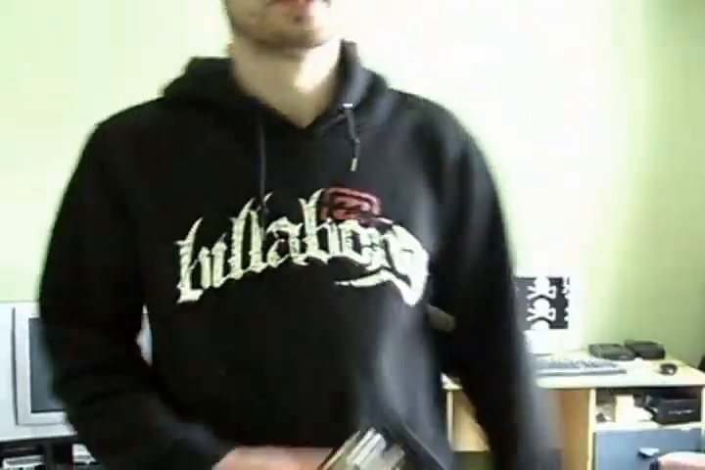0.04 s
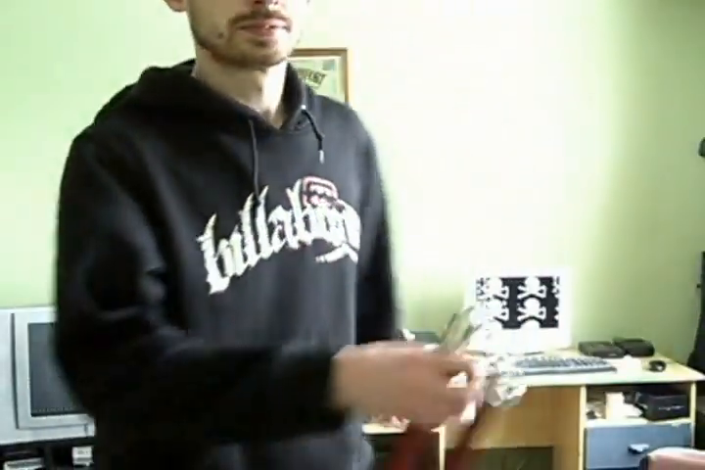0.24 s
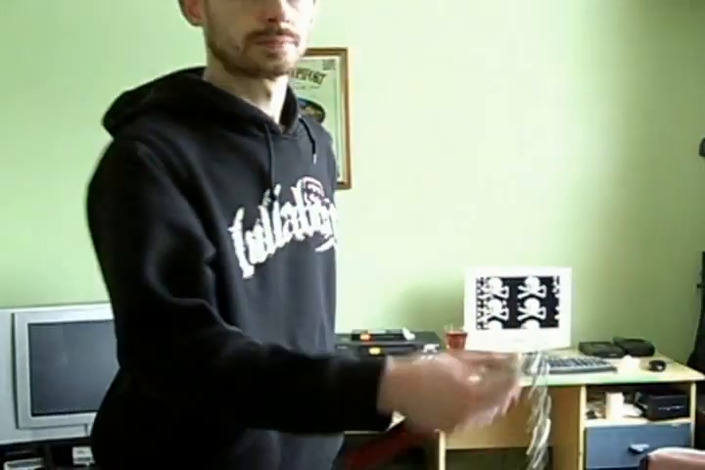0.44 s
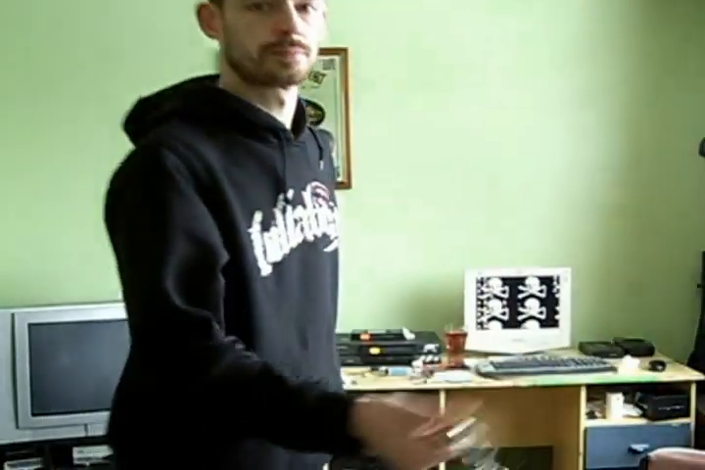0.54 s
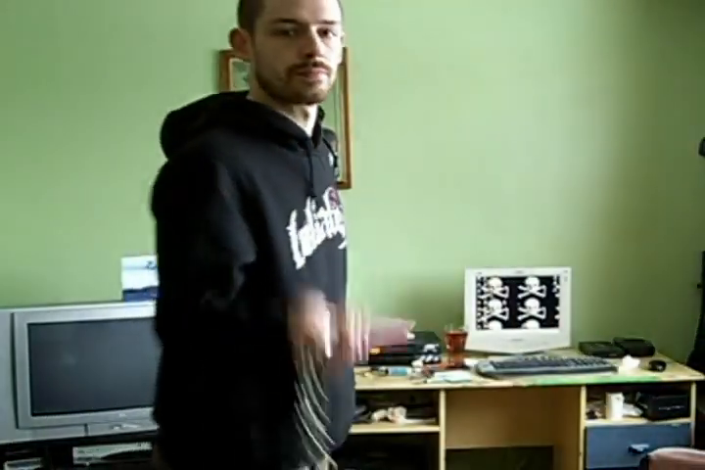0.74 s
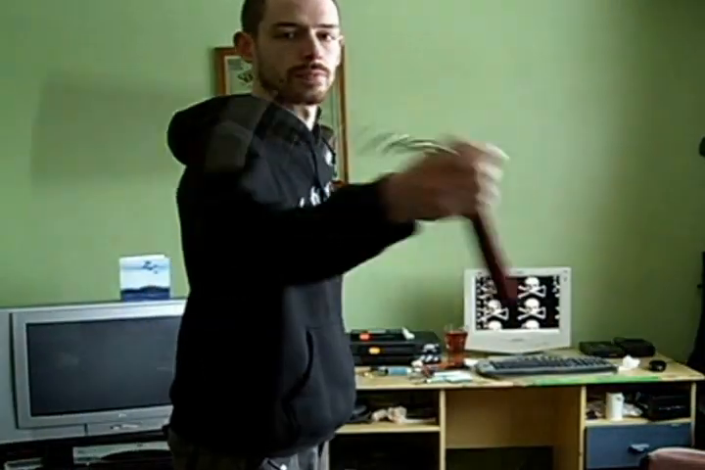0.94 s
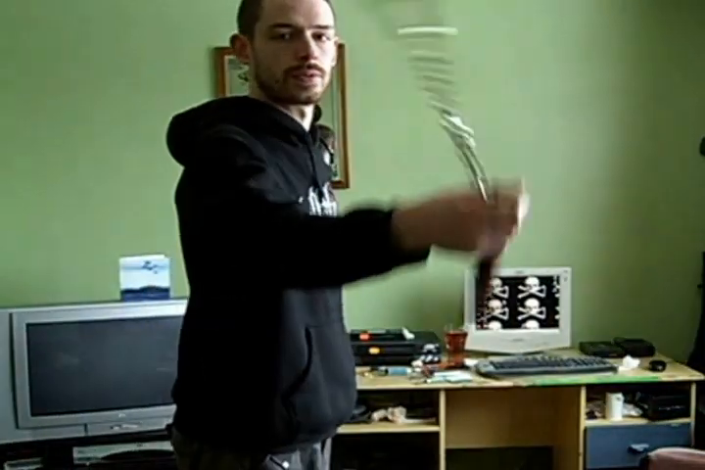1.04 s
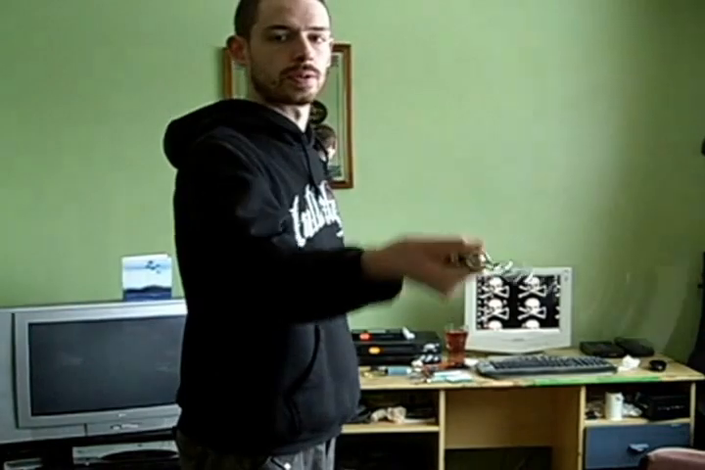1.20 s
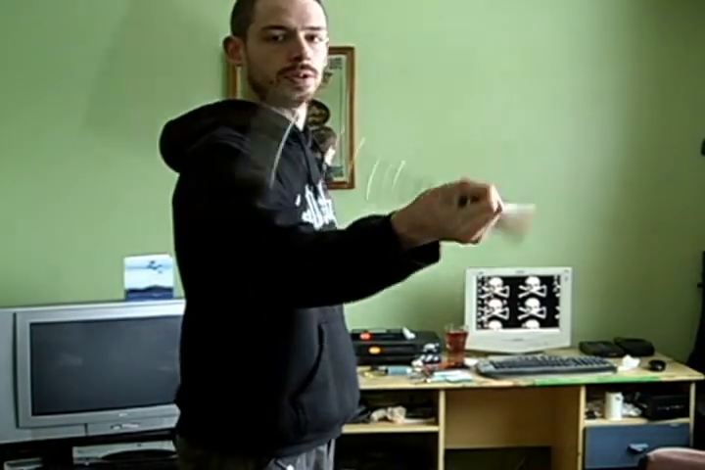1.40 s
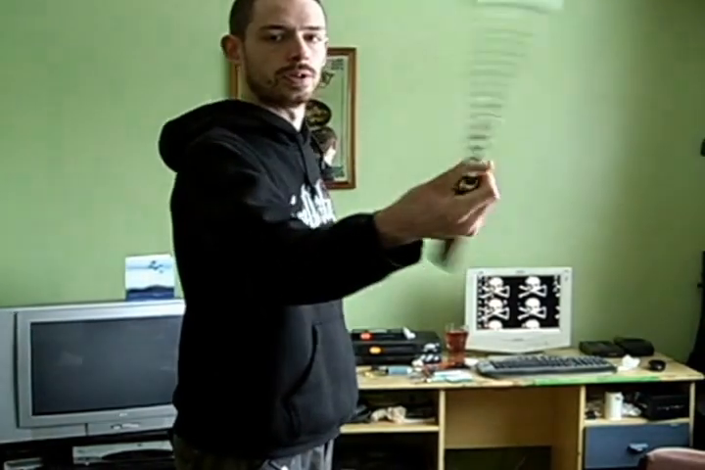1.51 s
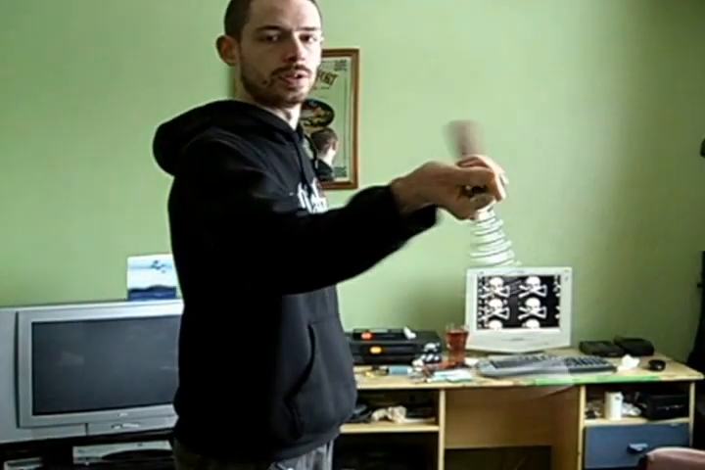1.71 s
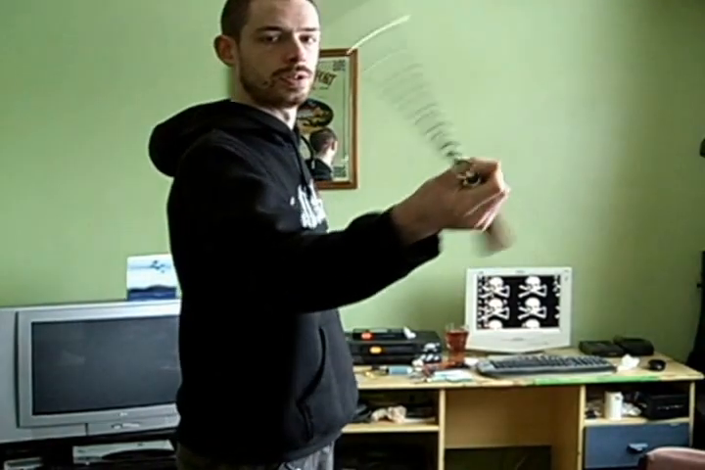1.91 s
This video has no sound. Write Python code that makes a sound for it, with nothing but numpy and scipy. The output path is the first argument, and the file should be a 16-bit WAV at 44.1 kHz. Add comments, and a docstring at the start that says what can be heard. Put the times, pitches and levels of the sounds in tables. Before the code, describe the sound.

Chain links on a nunchaku ring in a short, high rattle after a brief clatter fades. Irregular metal clicks and light wooden knocks follow, with soft cloth rustling and one faint swish, nearby in a quiet room.

```python
"""Nunchaku in a small room

A clatter dies away, the steel chain links strike and ring as the sticks are gathered, then links and
swivel click and the handles knock while a sleeve rustles and a stick whooshes. The walls answer
the chain and handles; a thin steady whine lies in the quiet room tone."""
import sys
import numpy as np
from scipy import signal
from scipy.fft import rfft, irfft
from scipy.io import wavfile
from scipy.ndimage import uniform_filter1d

SR = 44100
rng = np.random.default_rng(int(sys.argv[2]) if len(sys.argv) > 2 else 0)


def digitize_waveform(pressure):
    """Quantize a signal to 16-bit integers and store it at the path in sys.argv[1].

    Rows of a 2-D input are taken as channels; values are limited to [-1, 1].
    """
    field = np.atleast_2d(pressure).T
    bounded = np.clip(field, -1, 1)
    quanta = np.round(bounded * 32767).astype(np.int16)
    wavfile.write(sys.argv[1], SR, quanta)


N = 85995


def undb(db):
    """Decibels to gain."""
    return 10 ** (np.asarray(db) / 20)


def unit(x):
    """Scale to rms 1."""
    return x / np.sqrt(np.mean(x ** 2) + 1e-30)


def clock():
    """Sample times [s]."""
    return np.arange(N) / SR


def curve(points):
    """Gain along (time [s], level [dB]) points."""
    times_s, levels_db = np.array(points).T
    return undb(np.interp(clock(), times_s, levels_db))


def colour(x, points):
    """Filter by (frequency [Hz], level [dB]) points, to rms 1."""
    hz, db = np.array(points).T
    bins_hz = np.maximum(np.fft.rfftfreq(N, 1 / SR), 1)
    gain = undb(np.interp(np.log(bins_hz), np.log(hz), db))
    return unit(irfft(rfft(x) * gain, N))


def band(x, lo_hz, hi_hz):
    """Band-pass; the low edge stays at least 10 Hz under the high edge."""
    hi_hz = min(hi_hz, SR / 2 - 100)
    lo_hz = min(lo_hz, hi_hz - 10)
    return signal.sosfilt(signal.butter(2, [lo_hz, hi_hz], "band", fs=SR, output="sos"), x)


def steep_band(x, lo_hz, hi_hz):
    """Band-pass twice."""
    return band(band(x, lo_hz, hi_hz), lo_hz, hi_hz)


def add(out, start_s, x):
    """Mix x in at start_s."""
    i = max(int(start_s * SR), 0)
    out[i:i + len(x)] += x[:N - i]


def steady(x, window_s=0.009):
    """Level slow swells to rms 1, keep fast beating."""
    return x / np.sqrt(uniform_filter1d(x ** 2, size=int(window_s * SR)) + 1e-20)


def resonance(hz, width_hz):
    """Noise-driven mode at steady level."""
    pole = np.exp((2j * np.pi * hz - np.pi * width_hz) / SR)
    return steady(signal.lfilter([1], [1, -pole], rng.standard_normal(N)).imag)


def swell(peak_s, sigma_s, lo_hz, hi_hz):
    """Band noise under a Gaussian envelope."""
    envelope = np.exp(-0.5 * ((clock() - peak_s) / sigma_s) ** 2)
    return unit(band(rng.standard_normal(N), lo_hz, hi_hz)) * envelope


def taps(rows, note_db, crack_db, rise_s=0.0005):
    """Struck part: a damped note with a noisy crack around it."""
    out, t = np.zeros(N), clock()[:SR // 12]
    for start_s, hz, db, decay_s in rows:
        crack = unit(steep_band(rng.standard_normal(len(t)), hz * 0.59, hz * 1.39))
        note = np.sqrt(2) * np.sin(2 * np.pi * hz * t)
        envelope = np.exp(-t / decay_s) * (1 - np.exp(-t / rise_s))
        add(out, start_s, undb(db) * envelope * (undb(note_db) * note + undb(crack_db) * crack))
    return out


def room_tone(noise_db=-56, whine_db=-68):
    """Steady background noise with a thin, high whine."""
    # background spectrum (frequency [Hz], relative level [dB])
    spectrum = [(15, -43), (25, -0.5), (64, -13.5), (229, 1), (394, 1), (754, -2), (1020, -8.5), (1290, -6),
                (1600, -20), (6380, -18), (7510, -30), (11900, -19.5), (16000, -42.5)]
    noise = colour(rng.standard_normal(N), spectrum)
    return undb(noise_db) * noise + undb(whine_db) * resonance(hz=14400, width_hz=41)


def room(x, build_s=0.0083):
    """Near wall reflections, then four diffuse bands plus a faint narrow ring near 7.7 kHz."""
    # decaying tails (low edge [Hz], high edge [Hz], T60 [s], level [dB])
    # last row: the narrow ring; its inverted edges give a 10 Hz wide line
    tails = [(102, 1500, 0.47, -20), (1180, 3150, 0.23, -2), (3500, 7900, 0.29, -7),
             (8000, 12900, 0.247, -9.5), (12000, 7700, 0.2, -19.5)]
    # wall reflections (delay [s], level [dB])
    echoes = [(.0042, -12.5), (0.0172, -19.5), (0.0214, -10)]
    response, t = np.zeros(N), clock()[:SR // 2]
    for lo_hz, hi_hz, t60_s, db in tails:
        envelope = undb(-60 * t / t60_s) * (1 - np.exp(-t / build_s))
        envelope /= np.sqrt(np.sum(envelope ** 2))
        add(response, 0, undb(db) * band(rng.standard_normal(len(t)), lo_hz, hi_hz) * envelope)
    for delay_s, db in echoes:
        add(response, delay_s, undb([db]))
    return signal.fftconvolve(x, response[:len(t)])[:N]


def low_thump(level_db=-53):
    """A faint, brief low rumble."""
    return undb(level_db) * swell(peak_s=0.31, sigma_s=0.03, lo_hz=26, hi_hz=156)


def sleeve(grain_db=1.9):
    """Cloth rustles with the arm."""
    # rustle envelope (time [s], level [dB])
    levels = [(0, -58), (.19, -48.5), (.29, -43.5), (.36, -51), (.4, -49.5), (.46, -47.5), (.55, -57),
              (.61, -51), (.69, -58), (.85, -55.5), (1.0, -52), (1.09, -51), (1.28, -46), (1.38, -45),
              (1.46, -51), (1.65, -55), (1.95, -58.5)]
    # rustle spectrum (frequency [Hz], relative level [dB])
    spectrum = [(80, -34.5), (200, -1), (700, -2), (1500, 0), (2600, -4.5), (5000, -15.5), (8000, -18),
                (16000, -18)]
    grain = unit(uniform_filter1d(rng.standard_normal(N), size=200))
    return colour(rng.standard_normal(N) * undb(grain_db * grain), spectrum) * curve(levels)


def whoosh():
    """Air rushes past the stick at its fastest."""
    # air swells (peak time [s], sigma [s], frequency [Hz], level [dB])
    swells = [(1.522, 0.071, 720, -50.5), (1.47, 0.024, 1450, -51.5)]
    return sum(undb(db) * swell(peak_s, sigma_s, hz * 0.784, hz * 1.11)
               for peak_s, sigma_s, hz, db in swells)


def clatter(wash_db=-35, hold_s=0.03, wash_fall_db_per_s=174, ring_fall_db_per_s=145.5):
    """A diffuse clatter fades; its resonances ring a little longer."""
    # wash spectrum (frequency [Hz], relative level [dB])
    spectrum = [(100, -29.5), (213, -11.5), (452, -1), (750, -9), (1070, -13.5), (1600, -13), (2050, -14.5),
                (3180, -12.5), (4730, -8), (7200, -20), (11900, -8.5), (15000, -31)]
    # resonances (frequency [Hz], width [Hz], level [dB])
    modes = [(446, 67, -45), (1077, 16, -37.5), (1153, 60, -46.5), (1946, 49, -51.5), (2142, 32, -47),
             (3780, 51, -50.5), (4770, 150, -44)]
    fall_s = np.maximum(clock() - hold_s, 0)
    ring = band(sum(undb(db) * resonance(hz, width_hz) for hz, width_hz, db in modes), 300, 10000)
    wash = undb(wash_db) * colour(rng.standard_normal(N), spectrum)
    return ring * undb(-ring_fall_db_per_s * fall_s) + wash * undb(-wash_fall_db_per_s * fall_s)


def knocks():
    """Wooden handles knock and scrape: mostly crack."""
    # handle contacts (time [s], frequency [Hz], relative level [dB], decay [s])
    hits = [(.064, 1880, -36, 0.006), (.16, 203, -48, 0.023), (0.1942, 1680, -37.5, 0.0029),
            (0.3904, 1130, -37.5, 0.011), (0.399, 1840, -32.5, 0.004), (.594, 1370, -51, 0.0011),
            (.742, 1890, -33.5, 0.0016), (.746, 1500, -36, 0.0017), (.808, 336, -44, 0.0069),
            (.935, 1920, -35, .0012), (.9355, 1000, -54, 0.0013), (1.0197, 1530, -28, 0.0017),
            (1.3055, 1840, -37, 0.0021), (1.372, 1296, -43.5, 0.017), (1.372, 4900, -42.5, 0.016)]
    return taps(hits, note_db=-4, crack_db=2)


def pings():
    """Short tonal pings: high metal ticks and one lower, squeaky handle ring."""
    # pings (time [s], frequency [Hz], relative level [dB], decay [s])
    hits = [(.1612, 5300, -38.5, 0.0013), (.3335, 15500, -25, 0.0036), (.3462, 1890, -27.5, 0.0035),
            (.3795, 14430, -21, 0.002), (.532, 6360, -43, .0012), (.594, 3140, -41, 0.0015),
            (.6125, 4940, -36.5, 0.0017), (.6125, 6100, -37, 0.0013), (.6296, 4460, -47, 0.0031),
            (.7302, 6630, -34, 0.0016), (1.0995, 3020, -35, 0.00083), (1.113, 4570, -43, 0.0022),
            (1.1309, 4100, -31, 0.00074), (1.167, 4750, -31, 0.0015), (1.1668, 15200, -15, 0.00082),
            (1.2428, 11840, -21.5, 0.00051), (1.2428, 5150, -35.5, 0.0013), (1.3058, 4970, -36, 0.0014),
            (1.3601, 3290, -31.5, 0.0015), (1.3601, 5290, -22, 0.00062), (1.363, 2410, -35.5, 0.0027),
            (1.5255, 12900, -51, 0.0026), (1.725, 4850, -40.5, 0.0012), (1.002, 5130, -40, .0008)]
    return taps(hits, note_db=4, crack_db=-12)


def ticking(rate_per_s=24, drive_db=-20.5):
    """Loaded links creep against each other in faint, high ticks."""
    hits = (rng.random(N) < rate_per_s / SR) * rng.uniform(0.45, 1, N)
    return steep_band(undb(drive_db) * hits, lo_hz=11870, hi_hz=13500)


def chatter(rate_per_s=3600):
    """Dense, tiny contacts as links slide over each other."""
    # chatter envelope (time [s], level [dB])
    levels = [(0, -60), (.13, -56), (.19, -54), (.21, -41.5), (.25, -57), (.285, -53), (.315, -50),
              (.335, -34.5), (.36, -44), (.39, -35), (.43, -42.5), (.5, -65.5), (.95, -54.5), (1.13, -54),
              (1.19, -50.5), (1.28, -53.5), (1.45, -60.5), (1.95, -81)]
    # chatter spectrum (frequency [Hz], relative level [dB])
    spectrum = [(150, -34), (1000, -2), (3500, -5), (5000, 0), (7300, -7.5), (10000, -2.5), (12000, 0),
                (16000, -6.5)]
    hits = (rng.random(N) < rate_per_s / SR) * rng.choice([-1, 1], N)
    return colour(hits, spectrum) * curve(levels)


def snap(t, decay_s):
    """Tiny decaying burst with an even spectrum."""
    spectrum = rfft(rng.standard_normal(len(t)) * np.exp(-t / decay_s))
    whitened = irfft(spectrum / np.abs(spectrum), len(t))
    return whitened * np.exp(-t / (decay_s * 2 * np.pi))


def clicks(energy_window_s=0.004):
    """Taut chain and swivel snap together: short bursts, each with its own colour."""
    # clicks, before band gain (time [s], body [dB], low treble [dB], treble [dB], top [dB])
    hits = [(0.1945, -45.5, -58, -48, -44), (0.323, -57, -41, -35, -34), (0.332, -51, -50, -40, -31),
            (.384, -36.5, -58, -32.5, -43), (0.3888, -42, -37.5, -39, -30), (0.594, -44, -55, -71, -67),
            (0.6125, -45, -44, -44.5, -48), (0.7309, -47, -48, -49.5, -48), (1.0994, -39, -45.5, -69, -68),
            (1.1309, -64, -41, -45.5, -47), (1.167, -43, -37, -34.5, -25), (1.243, -60, -62, -49, -44),
            (1.263, -43, -45.5, -43, -51), (1.3055, -55, -45, -48, -51), (1.3599, -50, -35.5, -54, -64),
            (1.3637, -41, -42.5, -52, -68), (1.5254, -64, -50, -55, -48), (1.551, -51.5, -54, -70, -54),
            (1.6427, -60, -55, -57.5, -45.5), (1.6566, -48, -53.5, -55, -55),
            (1.7253, -54, -55.5, -70, -48.5), (1.785, -50, -59, -54.5, -68.5)]
    # those four bands (low edge [Hz], high edge [Hz], decay [s], gain [dB])
    bands = [(363, 2760, 0.0014, -1.5), (2630, 7140, 0.0014, 1), (7200, 13100, 0.0017, 2.5),
             (11050, 15000, 0.00063, 0)]
    out, t = np.zeros(N), clock()[:SR // 40]
    for start_s, *levels_db in hits:
        for db, (lo_hz, hi_hz, decay_s, gain_db) in zip(levels_db, bands):
            burst = steep_band(snap(t, decay_s), lo_hz, hi_hz)
            burst *= np.sqrt(energy_window_s * SR / np.sum(burst ** 2))
            add(out, start_s, burst * undb(db + gain_db))
    return out


def jingle(build_s=0.0017, decay_s=0.016, contact_db=-18.5, contact_decay_s=0.0077):
    """Each strike ticks and renews the ring: beating modes if links are free, one broad if damped."""
    # link-on-link strikes (time [s], level [dB], damped share [0-1])
    strikes = [(0.195, -31, 0), (0.206, -18.5, 0), (0.211, -20.5, 0), (0.2285, -16, 0.14),
               (0.255, -16.5, 0), (0.271, -17.5, 0), (0.2782, -11.5, 0), (0.291, -12.5, 0.1),
               (0.32, -17.5, 0.2), (0.332, -21, 0.6), (0.729, -39.5, 0.5), (.738, -33, 0.3),
               (0.7504, -36, 0.8), (0.762, -37.5, 0.7), (.776, -43, 0.8), (.79, -49, 1)]
    # free link modes (frequency [Hz], width [Hz], relative level [dB])
    modes = [(5169, 19, -20), (5090, 260, -22), (6380, 100, -24.5), (11134, 14.5, 2), (11300, 110, -8.5),
             (11280, 34, -8), (11620, 20, -8.5), (11900, 150, -10), (11800, 130, -16)]
    free_ring = steady(sum(undb(db) * resonance(hz, width_hz) for hz, width_hz, db in modes))
    damped_ring = steady(band(rng.standard_normal(N), lo_hz=11350, hi_hz=11650))
    contact_noise = band(rng.standard_normal(N), lo_hz=2670, hi_hz=15000)
    t = clock()[:SR // 4]
    envelope = np.exp(-t / decay_s) * (1 - np.exp(-t / build_s))
    free_power, damped_power, contact_gain = np.zeros((3, N))
    for start_s, db, damped_share in strikes:
        power = (undb(db) * envelope) ** 2
        add(free_power, start_s, (1 - damped_share) * power)
        add(damped_power, start_s, damped_share * power)
        add(contact_gain, start_s, undb(db + contact_db) * np.exp(-t / contact_decay_s))
    ring = free_ring * np.sqrt(free_power) + damped_ring * np.sqrt(damped_power)
    return ring + contact_noise * contact_gain


def scene(click_send_db=1, strike_send_db=-3):
    """Chain and handles with reverberation, other layers dry; mono."""
    clicking = clicks() + chatter() + ticking()
    striking = jingle() + knocks() + pings()
    reverb = room(undb(click_send_db) * clicking + undb(strike_send_db) * striking)
    background = clatter() + sleeve() + whoosh() + low_thump() + room_tone()
    return (clicking + striking + reverb + background)[None]


def record(dry, cutoff_hz=15950):
    """Steep low-pass on the top treble."""
    return signal.sosfilt(signal.ellip(8, 0.2, 70, cutoff_hz, fs=SR, output="sos"), dry)


dry = scene()
out = record(dry)
digitize_waveform(out)
```